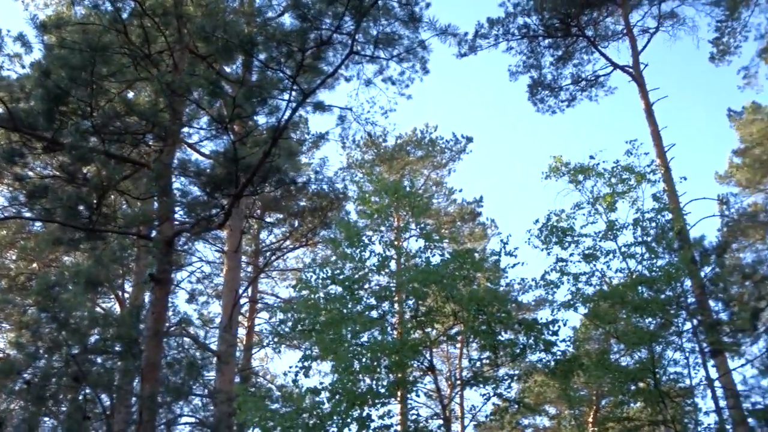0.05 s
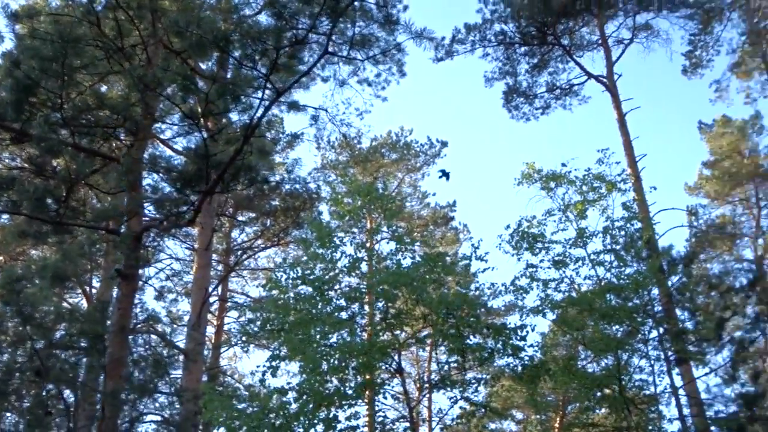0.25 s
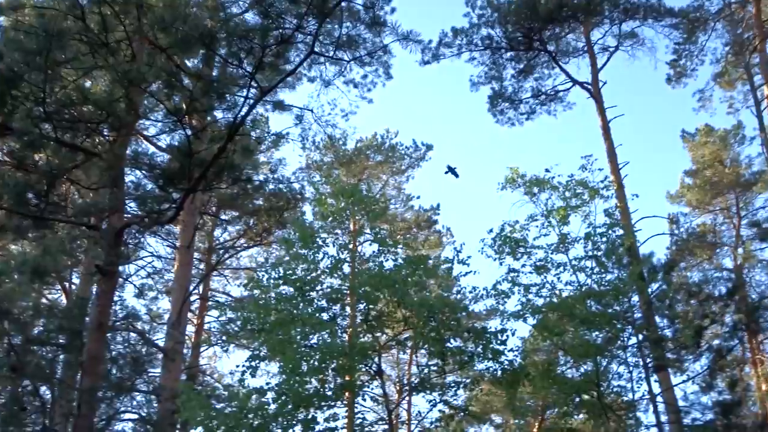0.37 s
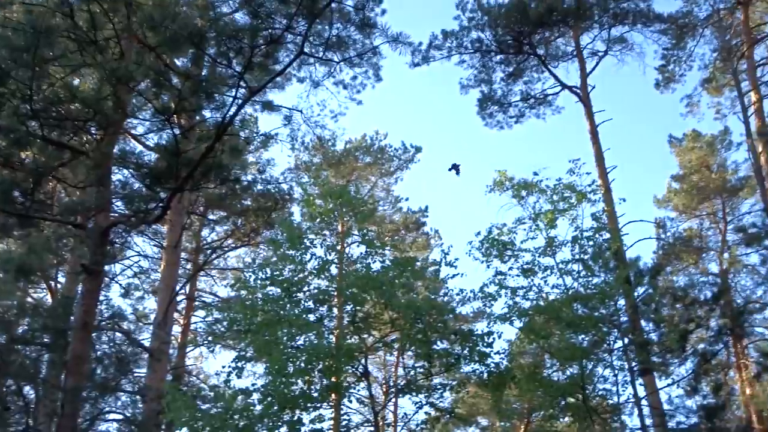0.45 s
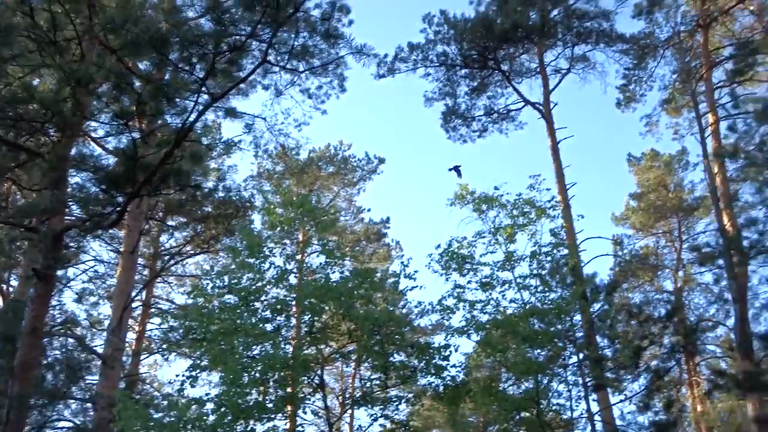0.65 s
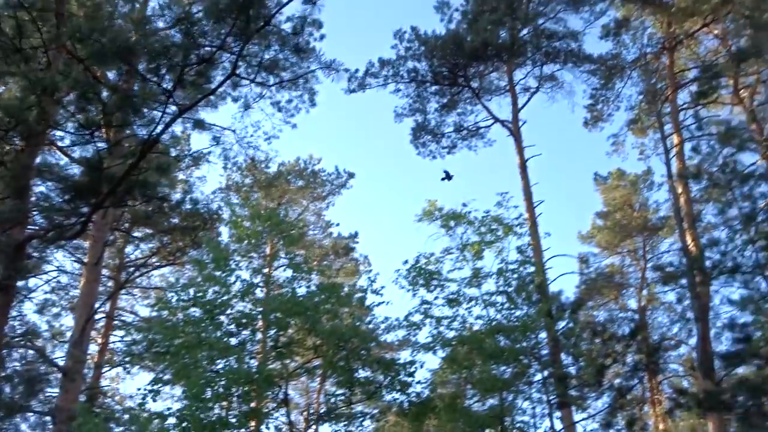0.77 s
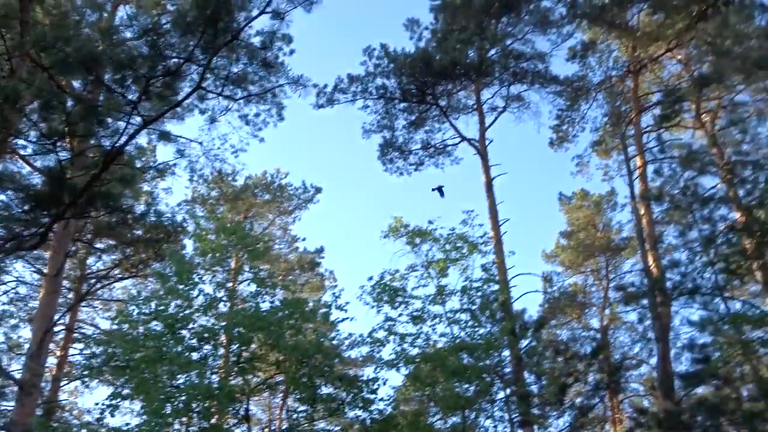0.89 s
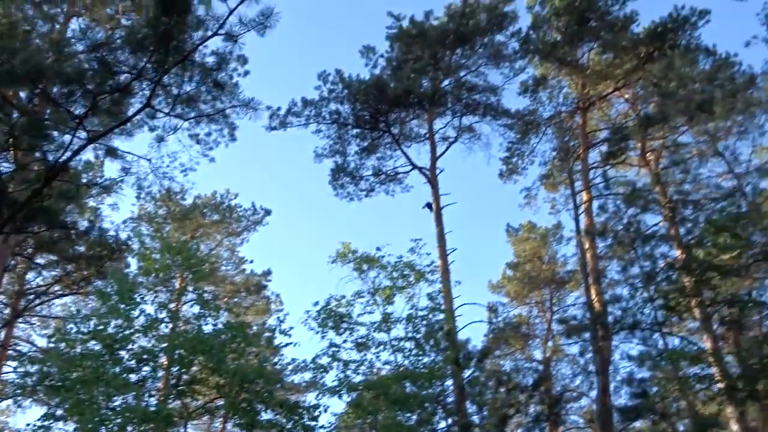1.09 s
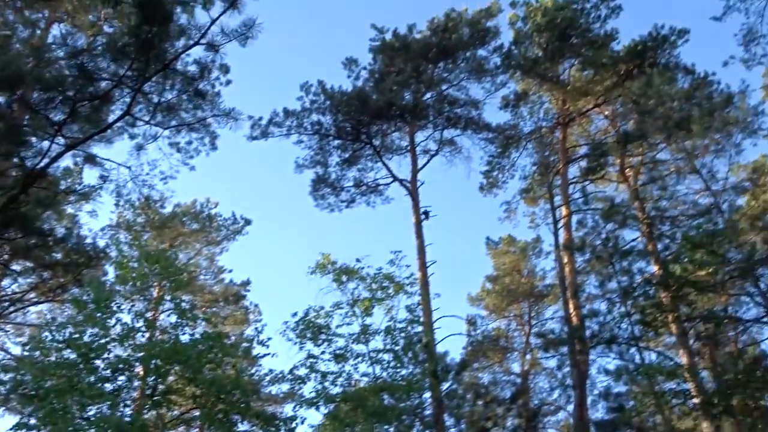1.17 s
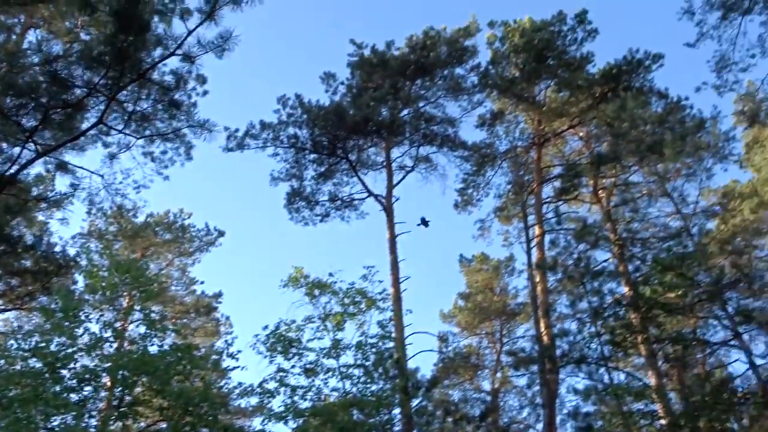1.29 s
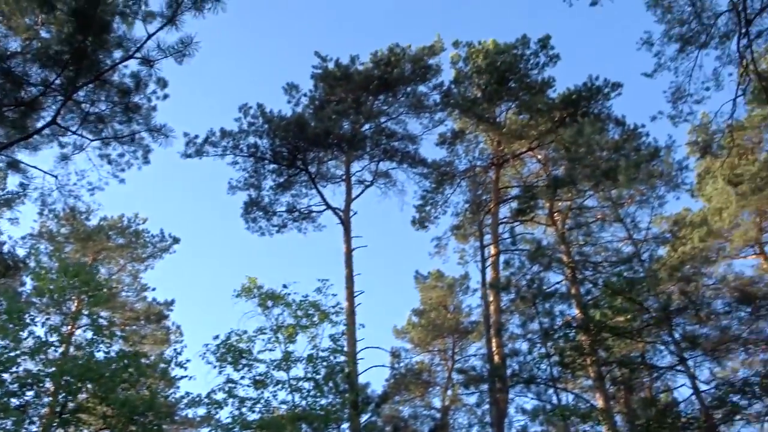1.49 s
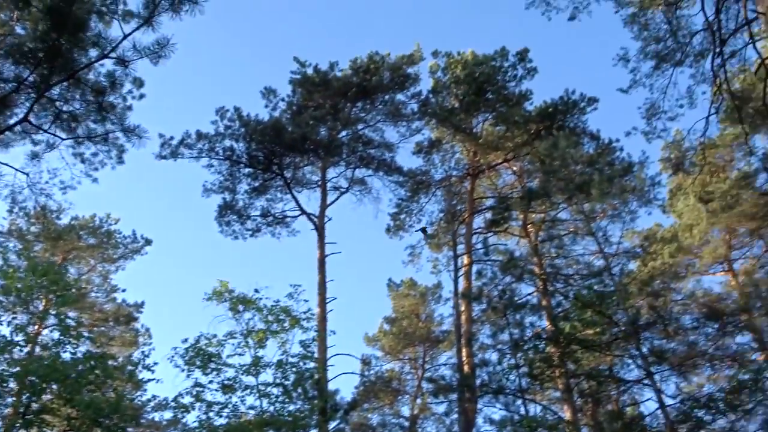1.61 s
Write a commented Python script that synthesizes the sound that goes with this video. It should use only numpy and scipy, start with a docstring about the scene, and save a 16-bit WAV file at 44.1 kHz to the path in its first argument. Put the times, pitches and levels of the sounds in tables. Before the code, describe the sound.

Two raspy caws from a flying crow echo among trees over faint forest air.

```python
"""A crow over a pine forest

A flying crow caws twice while the echo of an earlier caw dies away among the trunks. Each caw is a pulse
train from the syrinx, filtered by the throat; it starts as a dry rattle that slows into a flutter, which
modulates pitch and strength. A twig cracks close by in a run of noise bursts, over faint forest air
and a fading rumble. The sound is almost mono."""
import sys
import numpy as np
from scipy import signal
from scipy.fft import rfft, irfft, next_fast_len
from scipy.io import wavfile

SR = 44100
rng = np.random.default_rng(int(sys.argv[2]) if len(sys.argv) > 2 else 0)


def wav_record(signal):
    """Record a signal, one row per channel, as 16-bit PCM in the file named by sys.argv[1]."""
    frames = np.transpose(np.atleast_2d(signal))
    bounded = np.clip(frames, -1, 1)
    # unit amplitude maps onto the largest positive 16-bit level
    quanta = np.round(bounded * 32767).astype(np.int16)
    wavfile.write(sys.argv[1], SR, quanta)


N = 72765
PRE = SR // 2  # samples before time zero, room for the earlier caw
TILT_PIVOT_HZ = 3000


def crow():
    """Superposition: each caw arrives as direct sound plus its reverberation."""
    # Each row: start in seconds, length in seconds, gain in dB, rasp gain in dB, top pitch in Hz,
    # settled flutter rate in Hz, its time constant in seconds, rasp tilt in dB per octave,
    # final pitch drop in Hz, frequency scale of the rasp resonances.
    caws = [(-.31, 0.26, -26, -3.5, 399.7, 49.22, 0.053, -2, 31, 1.08),
            (0.2773, .22, -25, -3.5, 393.9, 48.8, 0.042, 1.5, 32, 1.0),
            (1.148, .222, -25.5, -5.5, 386.6, 46.83, .062, -1.5, 18, 1.05)]
    track = np.zeros(PRE + N)
    for start, length, db, *voice in caws:
        call = amp(db) * caw(length, *voice)
        add(track, start, call)
        add(track, start, forest(call))
    return track[PRE:]


def caw(length, rasp_db, pitch_hz, flutter_hz, settle_s, tilt_db, drop_hz, throat_scale):
    """Source and filter: syrinx pulses, modulated by a slowing flutter, excite the throat's resonances."""
    # Throat resonances for the body of the voice, its bright rasp and the clicks of the rattle.
    # Each row: frequency in Hz, relative level in dB.
    body_shape = [(100, -60), (400, -55), (620, -28), (740, -17.5), (850, -12.5), (970, -15), (1105, 4),
                  (1220, -4), (1370, -11.5), (1640, -5.5), (1900, -12.5), (2200, -21.5), (3000, -40),
                  (8000, -80)]
    rasp_shape = [(200, -91), (1500, -39.5), (2230, -10), (2560, 6), (2800, -1.5), (3120, -6.5), (3650, 2),
                  (4200, -6), (5400, -14.5), (6300, -22.5), (7100, -26), (8000, -34), (10000, -29),
                  (13000, -56), (16000, -82)]
    click_shape = [(100, -71), (300, -37), (560, -12), (720, -7), (860, 7.5), (970, 5.5), (1200, -6),
                   (1400, -1.5), (1620, -7), (1900, -50), (3000, -19), (8000, -93)]
    flutter_start_hz, arch_top_s, click_peak_s = 103.9, .095, .044
    swell_s, swell_db, rasp_swell_s, rasp_swell_db = .092, 14, .18, 8
    rattle_db, flutter_db, release_db_per_s = 18.5, 4, 638
    t = np.arange(SR // 2) / SR

    # Frequency modulation: the pitch follows an arch and swings once in each flutter cycle.
    flutter_cycles = flutter_hz * t
    flutter_cycles += (flutter_start_hz - flutter_hz) * settle_s * (1 - np.exp(-t / settle_s))
    arch_hz = pitch_hz - drop_hz * np.minimum(((t - arch_top_s) / (length - arch_top_s)) ** 2, 2)
    swing_depth = .1078 * (1 - np.exp(-t / .038))
    swing = swing_depth * np.cos(2 * np.pi * (flutter_cycles - .365))
    pitch_cycles = np.cumsum(arch_hz * (1 + swing)) / SR

    # Amplitude modulation: the level falls through each flutter cycle, most steeply at the onset.
    onset = np.clip(1 - t / swell_s, 0, 1)
    rasp_onset = np.clip(1 - t / rasp_swell_s, 0, 1)
    flutter_phase = flutter_cycles % 1
    chop_db = (rattle_db * np.sqrt(onset) + flutter_db) * flutter_phase
    release = amp(-release_db_per_s * np.maximum(t - length, 0))
    drive = release * amp(-swell_db * onset - chop_db)
    rasp_gain = amp(rasp_db - rasp_swell_db * rasp_onset - flutter_db * (flutter_phase - .5))

    voice = pulses(pitch_cycles)
    clicks = pulses(flutter_cycles) * t / click_peak_s * np.exp(1 - t / click_peak_s)
    hiss = unit(rng.standard_normal(len(t)) * np.exp(-3 * (pitch_cycles % 1)))  # a puff per pulse
    body_source = drive * roughen(voice, hiss, noise_share=.05)
    rasp_source = drive * rasp_gain * roughen(voice, hiss, noise_share=.17)
    rasp_source += amp(rasp_db - 16.5) * clicks
    tilted = [(hz * throat_scale, db + tilt_db * np.log2(hz / TILT_PIVOT_HZ)) for hz, db in rasp_shape]
    rattle = ring(amp(-15.5) * clicks, click_shape)

    # The lowest partial is a clean sine that throbs with the flutter.
    throb = 1 + .34 * np.cos(2 * np.pi * (flutter_cycles - .24))
    envelope = (1 - np.exp(-t / .021)) * throb * release
    fundamental = amp(-19) * np.sqrt(2) * np.sin(2 * np.pi * pitch_cycles) * envelope
    return fundamental + ring(body_source, body_shape) + rattle + ring(rasp_source, tilted)


def pulses(cycles, jitter_s=.00003, shimmer_db=1.3, half_width=8):
    """Jitter and shimmer: one band-limited pulse per cycle, uneven in time and level, at rms 1."""
    at = np.interp(np.arange(1, int(cycles[-1])), cycles, np.arange(len(cycles)))
    chance = rng.standard_normal((2 * SR // 100, 2))[:len(at)]
    at = (at + jitter_s * SR * chance[:, 0])[:, None]
    taps = np.floor(at).astype(int) + np.arange(1 - half_width, half_width + 1)
    window = np.cos(np.pi * (taps - at) / (2 * half_width)) ** 2
    shape = np.sinc(taps - at) * window * amp(shimmer_db * chance[:, 1:])
    return unit(np.bincount(np.clip(taps, 0, len(cycles) - 1).ravel(), shape.ravel(), len(cycles)))


def roughen(voice, hiss, noise_share):
    """Uncorrelated signals add in power: hiss takes the given share of it."""
    return np.sqrt(1 - noise_share) * voice + np.sqrt(noise_share) * hiss


def forest(x, near_db=-13, near_t60=.08):
    """Reverberation: near crowns scatter briefly; trunks return a long echo whose treble dies first."""
    # Decay of the echo. Each row: frequency in Hz, reverberation time in seconds.
    decay_times = [(300, 3.3), (1100, 1.65), (2500, 1.12), (5000, 0.79), (10000, 0.65)]
    # Strength of the echo. Each row: frequency in Hz, level in dB.
    echo_levels = [(300, -15.5), (850, -14.5), (1130, -7), (1450, -10), (1800, -7.5), (3000, -15.5),
                   (6000, -11), (10000, -5.5)]
    hz, t, noise = signal.stft(rng.standard_normal(3 * SR // 2), SR, nperseg=256)
    t60 = along(decay_times, hz)[:, None]
    energy_norm = np.sqrt(2 * np.log(1000) / (t60 * SR))
    decay = amp(along(echo_levels, hz)[:, None] - 60 * t / t60) * energy_norm
    tail = signal.istft(noise * decay, SR, nperseg=256)[1]
    near = burst(np.arange(len(tail)) / SR, near_t60)
    return signal.fftconvolve(x, tail + amp(near_db) * near / np.linalg.norm(near))


def twig(echo_db=-11.5, echo_t60=.15):
    """Brittle fracture: a dry twig breaks in a quick run of bright bursts, each with a short echo."""
    # Each row: start in seconds, level in dB, 60 dB decay time in seconds, bassward tilt in dB per octave.
    splinters = [(0.1921, -18, 0.0027, 0), (0.1962, -29, 0.0087, -3), (.2014, -27, 0.0026, -5.5),
                 (0.204, -28.5, 0.0029, 1.5), (0.2063, -21.5, 0.0061, 2)]
    # Resonances of the twig. Each row: frequency in Hz, relative level in dB.
    wood_shape = [(200, -40), (500, -12), (2000, -7), (2800, -17), (3500, -7), (6000, -9), (7000, 0),
                  (7700, -14), (8700, 0.5), (10500, 0.5), (12500, -11.5), (15500, -25)]
    track, t = np.zeros(PRE + N), np.arange(SR // 4) / SR
    for start, db, t60, bass_db in splinters:
        colour = [(hz, level - bass_db * np.log2(hz / TILT_PIVOT_HZ)) for hz, level in wood_shape]
        crack = amp(db) * ring(burst(t, t60), colour)
        echo = burst(t, echo_t60)
        add(track, start, crack)
        add(track, start, amp(echo_db) * signal.fftconvolve(crack, echo / np.linalg.norm(echo)))
    return track[PRE:]


def air(level_db=-52.5):
    """Stationary broadband noise: the faint rush of the forest."""
    # Each row: frequency in Hz, relative level in dB.
    air_spectrum = [(25, -57), (60, -28), (120, -21.5), (190, -11), (370, -3), (600, -2), (1000, -0.5),
                    (2200, -10), (4500, -20.5), (9500, -21), (13000, -29), (15500, -25)]
    return amp(level_db) * coloured_noise(air_spectrum)


def rumble(start_db=-60, fade_db_per_s=15.5):
    """Exponential decay: a low rush slowly fades."""
    # Each row: frequency in Hz, relative level in dB.
    rumble_spectrum = [(25, -35), (60, -26), (120, -18), (190, -5.5), (350, -15.5), (700, -15), (2000, -62)]
    return amp(start_db - fade_db_per_s * np.arange(N) / SR) * coloured_noise(rumble_spectrum)


def coloured_noise(points):
    """Spectral shaping: white noise takes on a (Hz, dB) curve, at rms 1."""
    return unit(filtered(rng.standard_normal(N), lambda hz: amp(along(points, hz))))


def burst(t, t60):
    """Exponential damping: white noise falls 60 dB in t60 seconds."""
    return rng.standard_normal(len(t)) * amp(-60 * t / t60)


def ring(x, points, size=4096):
    """Resonance: x passes through a minimum-phase filter of unit energy and given (Hz, dB) shape."""
    cepstrum = irfft(np.log(amp(along(points, np.fft.rfftfreq(size, 1 / SR)))))
    cepstrum[1:size // 2] *= 2
    cepstrum[size // 2 + 1:] = 0
    impulse_response = irfft(np.exp(rfft(cepstrum)))
    return signal.fftconvolve(x, impulse_response / np.linalg.norm(impulse_response))[:len(x)]


def filtered(x, response):
    """Linear filtering: the spectrum of x is multiplied by a complex frequency response."""
    n = x.shape[-1]
    padded = next_fast_len(n + SR // 4)
    return irfft(rfft(x, padded) * response(np.fft.rfftfreq(padded, 1 / SR)), padded)[..., :n]


def along(points, hz):
    """Interpolation of (Hz, value) points on a logarithmic frequency axis."""
    freqs, values = np.transpose(points)
    return np.interp(np.log(hz + 1), np.log(freqs + 1), values)


def amp(db):
    """Decibels as an amplitude ratio."""
    return 10 ** (np.asarray(db) / 20)


def unit(x):
    """Normalisation to rms 1."""
    return x / np.sqrt(np.mean(x ** 2) + 1e-20)


def add(track, start, x):
    """Superposition of x on the track from start, in seconds."""
    part = track[PRE + round(start * SR):][:len(x)]
    part += x[:len(part)]


def scene(far_balance_db=-1.1, twig_balance_db=-2.2, twig_lead_s=5e-6):
    """Phase and level differences: sound reaches two closely spaced microphone ports almost alike."""
    # For the far sounds. Each row: frequency in Hz, phase lead of the left port in radians.
    phase_lead = [(0, 0.38), (600, -0.38), (4130, -0.3), (16200, 0.0)]
    sides = np.array([[1], [-1]])  # left, right
    far = filtered(crow() + air() + rumble(), lambda hz: np.exp(.5j * sides * along(phase_lead, hz)))
    far *= amp(sides * far_balance_db / 2)
    close = filtered(twig(), lambda hz: np.exp(1j * np.pi * sides * hz * twig_lead_s))
    close *= amp(sides * twig_balance_db / 2)
    antiphase_air = sides * amp(-18.5) * air()
    return far + close + antiphase_air


def record(dry, top_hz=15800):
    """Band limiting: an ideal low-pass filter removes the highest treble."""
    return filtered(dry, lambda hz: hz < top_hz)


dry = scene()
out = record(dry)
wav_record(out)
```